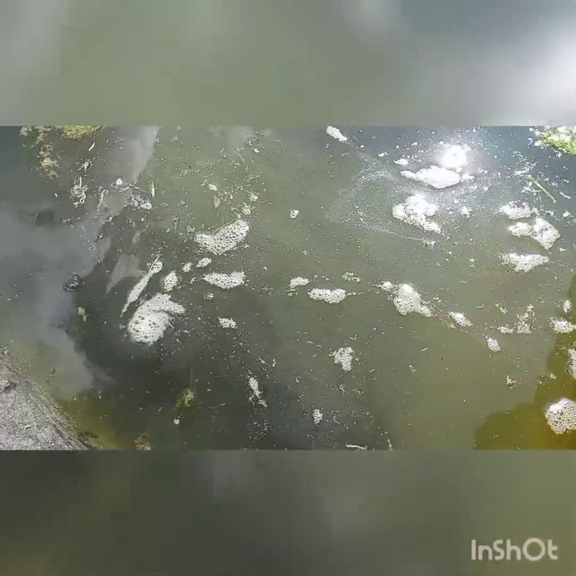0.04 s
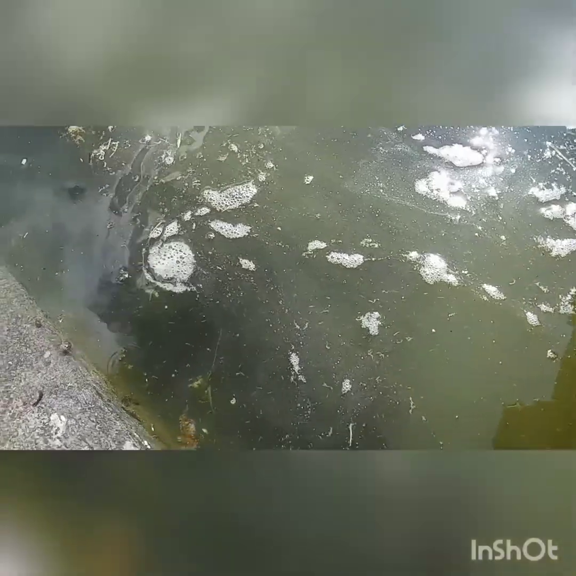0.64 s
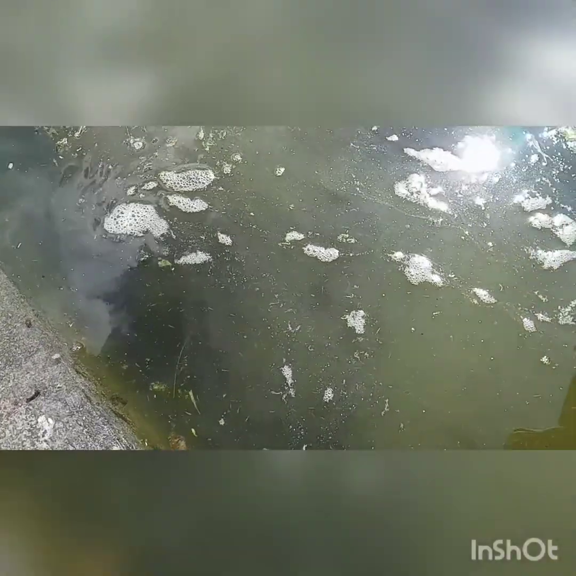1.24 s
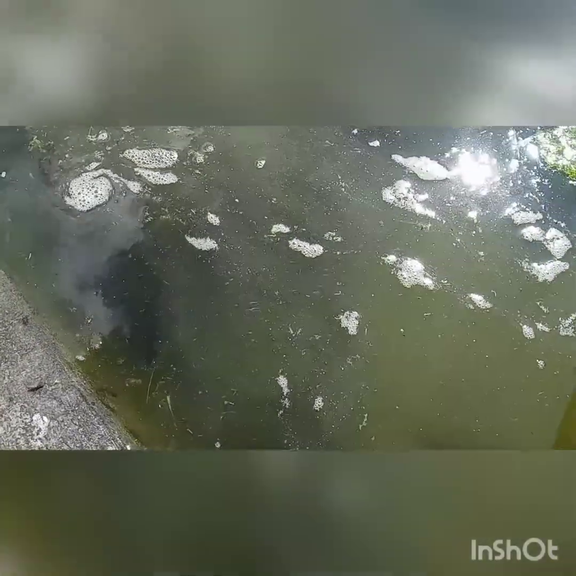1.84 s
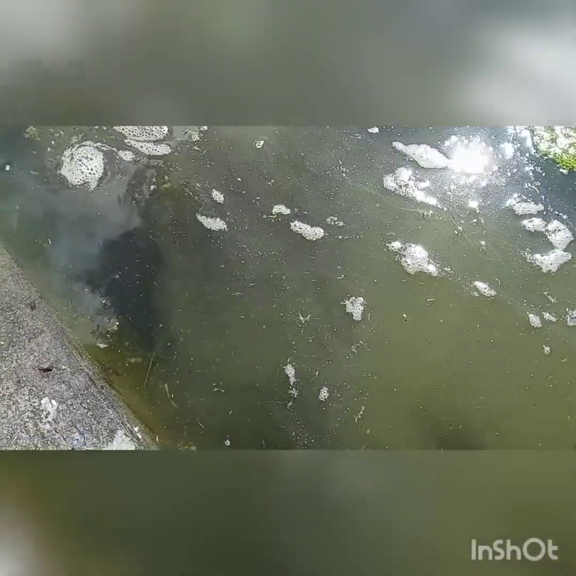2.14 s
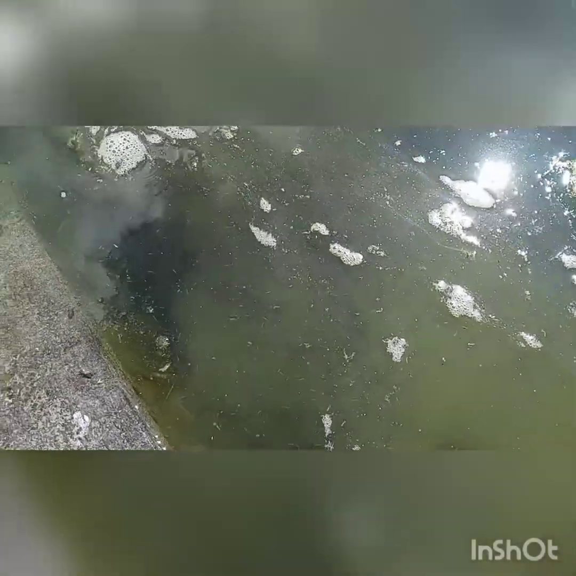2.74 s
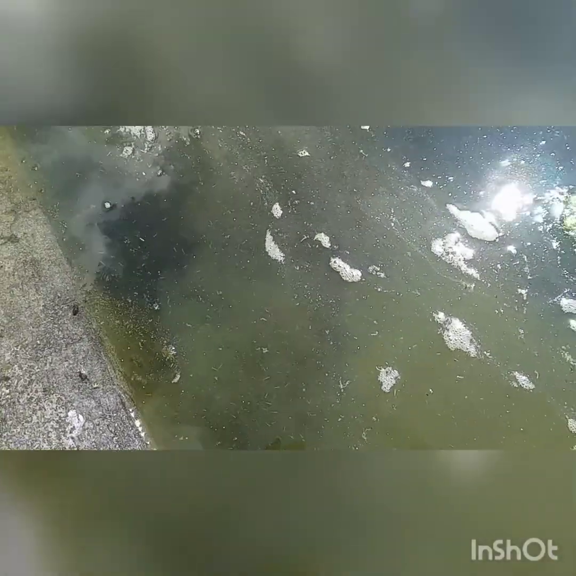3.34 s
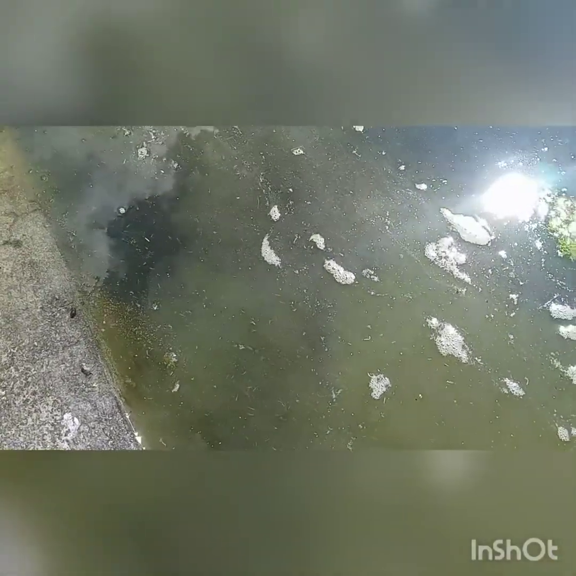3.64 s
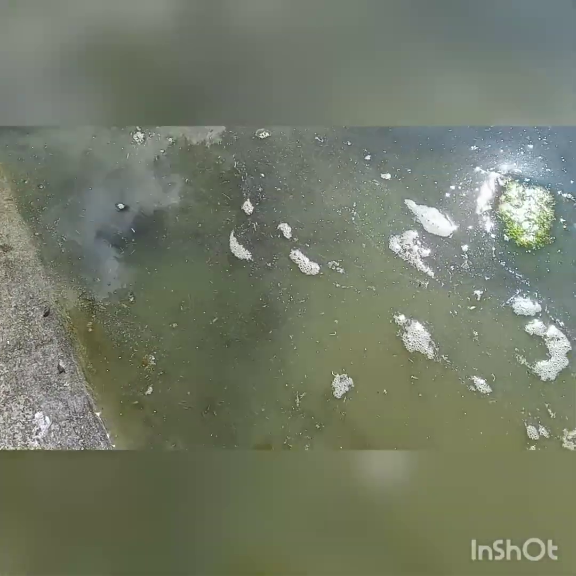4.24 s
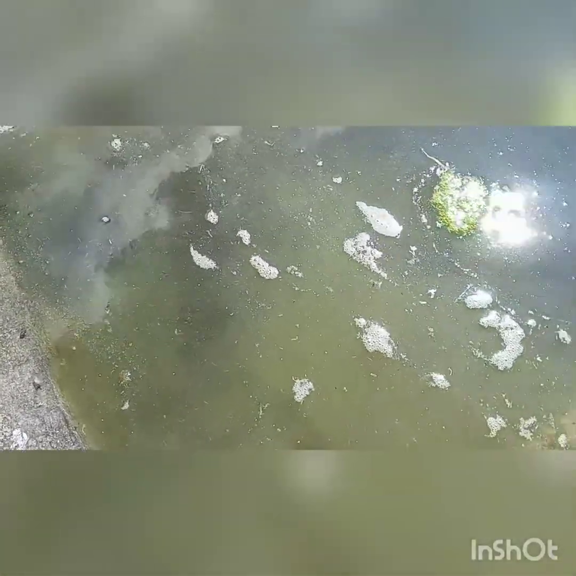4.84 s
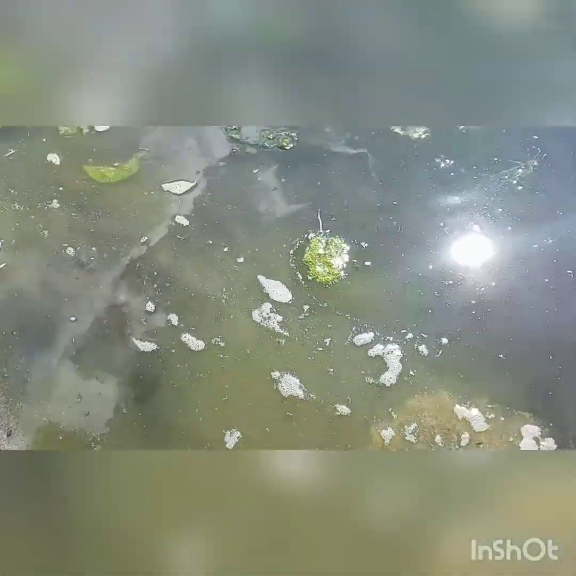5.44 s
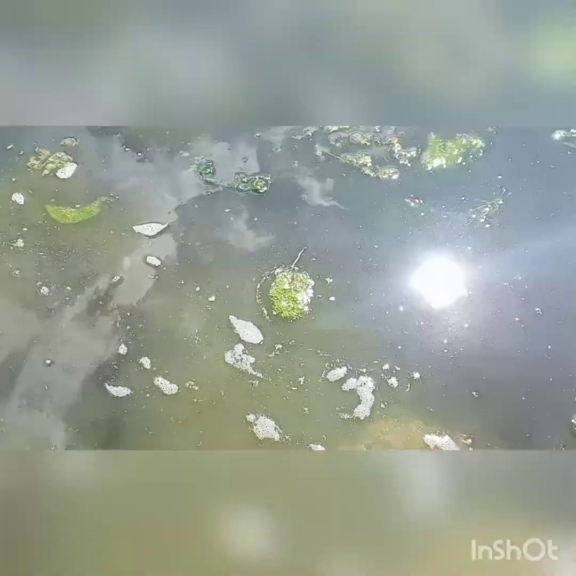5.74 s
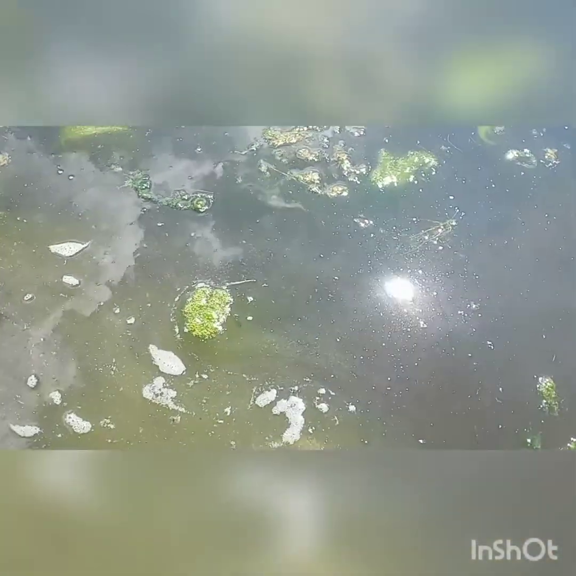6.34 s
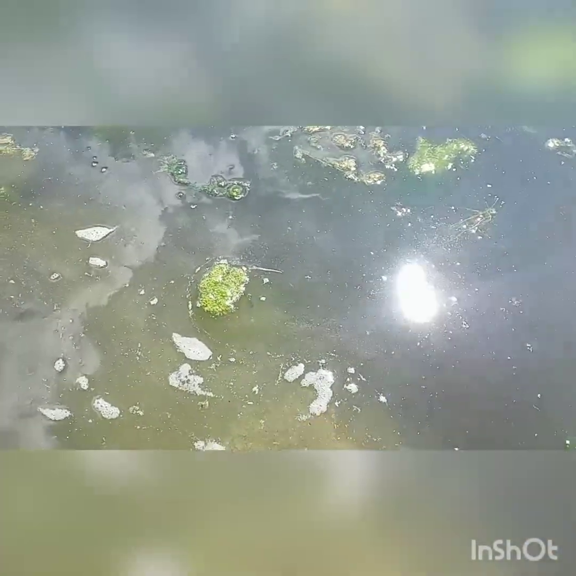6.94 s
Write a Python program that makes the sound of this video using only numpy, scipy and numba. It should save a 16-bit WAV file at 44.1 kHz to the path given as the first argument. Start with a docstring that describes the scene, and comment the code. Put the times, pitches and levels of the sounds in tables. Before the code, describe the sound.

Close plops of pond water build into dripping, gushing splashes off a hollow bucket while two insects chirp outdoors.

```python
"""From the start, pond water laps and plops close by in faint outdoor air, while an insect chirps behind it
in double wing strokes. A second, higher insect ticks, then settles into a trill after two seconds.
From about three seconds a bucket is tipped and lifted out: its wall rings, and water drips, gushes and
splashes, hardest past five seconds and near the end, twice with a thin, high whistle. The water's voice is
trapped air ringing, in single bubbles, soft swarms and sharp bursts; the last big splash rings the bucket."""
import sys
import numpy as np
from scipy import signal
from scipy.fft import rfft, irfft
from scipy.io import wavfile
from scipy.ndimage import uniform_filter1d
from numba import njit

SR = 44100
rng = np.random.default_rng(int(sys.argv[2]) if len(sys.argv) > 2 else 0)


def unload_audio(sound):
    """Save the sound as a 16-bit wav file, at the path given as the first command line argument."""
    columns = np.transpose(np.atleast_2d(sound))
    # keep every value between -1 and 1, then stretch to whole-number steps
    steps = np.round(np.clip(columns, -1, 1) * 32767)
    wavfile.write(sys.argv[1], SR, steps.astype(np.int16))


N = 307818
TIME = np.arange(N) / SR

# Cue levels are set ahead of each layer's own trim.
# short ringing tones: single bubbles, plus the bucket's ring under the last big splash (near 6.8 s):
# start_s, pitch_hz, level_db, nominal_decay_s
RING_CUES = [(0.0, 845.7, -47.5, 0.065), (0.06, 400.6, -39.5, 0.0214), (0.06, 201.4, -34, 0.079),
             (0.064, 250.8, -44, 0.186), (0.07, 162.5, -45, 0.37), (0.169, 760.3, -43, 0.0376),
             (0.38, 715, -45, 0.217), (0.413, 955, -40.5, 0.0097), (0.522, 680, -44, .1),
             (0.539, 650, -37, .24), (0.619, 700.4, -51.5, 0.134), (0.712, 1102, -56, 0.123),
             (0.89, 665, -48, 0.123), (0.9105, 3622, -38, 0.094), (1.078, 1654, -49, 0.079),
             (1.207, 1662, -41.5, .07), (1.759, 1734, -51.5, 0.265), (1.785, 1387, -48, 0.17),
             (1.873, 719.4, -55, 0.14), (1.971, 712.4, -39.5, 0.124), (2.03, 2283, -51.5, 0.06),
             (2.27, 635, -44.5, 0.112), (2.352, 660, -40, 0.148), (2.482, 843.7, -42, 0.029),
             (2.503, 769, -49, 0.114), (2.713, 664.8, -55, 0.206), (2.917, 675.4, -43, 0.088),
             (2.9365, 418.7, -35.5, .04), (2.9385, 4174, -38.5, .03), (3.412, 758, -48.5, 0.096),
             (3.466, 736.1, -36.5, 0.087), (3.717, 673.3, -42, .19), (4.002, 678.3, -41, 0.156),
             (4.039, 674.9, -37.5, 0.1255), (4.464, 873, -49, 0.032), (4.65, 412, -45.5, 0.0386),
             (4.72, 882, -48.5, 0.232), (4.76, 1580, -42, 0.026), (4.796, 1103, -39, 0.033),
             (4.913, 1409, -46.5, 0.094), (4.9507, 2758, -34, 0.04), (5.05, 725, -45.5, 0.058),
             (5.108, 2392, -36.5, 0.039), (5.127, 1075, -36, 0.0396), (5.174, 989, -39, 0.17),
             (5.2323, 797.1, -31, 0.076), (5.3107, 818.7, -27, 0.0757), (5.434, 3707, -23.5, 0.026),
             (5.434, 1331, -35.5, 0.0604), (5.436, 1726, -34, 0.0374), (5.502, 2353, -45, 0.111),
             (5.559, 1105, -32, 0.112), (5.622, 874.4, -49, 0.2), (5.7805, 3929, -28, 0.0272),
             (5.817, 789, -46, 0.14), (5.841, 1523, -43, 0.078), (5.857, 994.5, -45.5, 0.096),
             (5.853, 3025, -44, 0.037), (6.034, 810.5, -52.5, 0.224), (6.093, 645.7, -40, 0.119),
             (6.17, 841.3, -48.5, 0.227), (6.265, 549.5, -41, .05), (6.283, 1841, -27, 0.0102),
             (6.298, 607, -32, 0.025), (6.3146, 634.2, -35.5, 0.042), (6.543, 1273, -45, 0.077),
             (6.648, 727.6, -35.5, 0.078), (6.795, 2034, -25.5, 0.052), (6.796, 1077, -32, 0.074),
             (6.798, 2644, -27, 0.045), (6.824, 158.8, -43.5, 0.075), (6.871, 860.4, -49.5, 0.495),
             (6.898, 834.2, -42.5, 0.064), (6.931, 4167, -41, 0.03), (6.955, 674.3, -40, 0.161)]
# wavelets folding over: start_s, level_db, typical_pitch_hz
LAP_CUES = [(0.039, -53, 1603), (0.06, -55, 806), (0.11, -61.5, 1400), (0.172, -58.5, 1013),
            (0.251, -65.5, 3700), (0.411, -61, 1182), (0.851, -62, 4660), (1.076, -58, 1396),
            (1.211, -58, 1315), (1.62, -64, 1055), (1.789, -57.5, 1387), (1.83, -59.5, 1300),
            (1.9, -60, 900), (2.024, -61.5, 1980), (2.2, -66, 3600), (2.28, -53.5, 800), (2.499, -53, 1010),
            (2.589, -61, 1370), (2.83, -53.5, 2365), (2.84, -59.5, 750), (2.965, -56.5, 2200),
            (3.0, -58, 1600), (3.038, -60, 2990), (3.123, -59.5, 2320), (3.38, -64, 3450),
            (3.42, -58, 1290), (3.48, -53.5, 714), (3.825, -58, 1194), (3.97, -62.5, 1017),
            (4.06, -62, 760), (4.134, -62, 3810), (4.445, -57.5, 534.4), (4.589, -62, 2820),
            (4.656, -62, 2290), (4.744, -61.5, 2200), (5.039, -53.5, 2500), (5.109, -53.5, 2667),
            (5.17, -55.5, 1080), (5.25, -56.5, 1070), (5.34, -56, 1510), (5.84, -54, 2830),
            (5.91, -58.5, 3350), (6.09, -57.5, 600), (6.3, -56, 700), (6.645, -52.5, 620),
            (6.689, -51, 4230), (6.74, -57.5, 1700), (6.835, -53.5, 606)]
# borders of the bubble size classes in a wavelet: edge_hz
LAP_EDGES_HZ = [500, 1100, 2000, 3000, 4100]
# drops hitting the water: start_s, level_db, typical_pitch_hz, spread_octaves
DROP_CUES = [(0.345, -57, 6500, .55), (1.12, -59, 7500, 0.53), (1.527, -61, 7500, .45),
             (2.9392, -38, 620, 1.8), (2.975, -57, 7000, 0.44), (3.29, -57.5, 7500, 0.39),
             (3.305, -58, 7500, .5), (3.619, -55.5, 7500, 0.497), (4.443, -55, 3000, 2.2),
             (4.569, -44, 8580, .55), (4.597, -50, 8500, 0.725), (4.655, -52.5, 450, 1.76),
             (4.798, -49, 3800, 1.4), (4.951, -50.5, 4100, 0.93), (5.0, -45.5, 6400, 0.885),
             (5.027, -51.5, 8000, 0.81), (5.0554, -44.5, 6040, 0.764), (5.106, -46, 8000, 1.81),
             (5.131, -44, 5530, 0.89), (5.1557, -39.5, 5920, 0.856), (5.19, -55.5, 5000, 2.32),
             (5.296, -34.5, 4227, 0.531), (5.311, -46, 3000, 1.77), (5.3368, -45, 3200, 1.24),
             (5.359, -46, 8030, 0.52), (5.392, -51.5, 7000, 0.53), (5.409, -54, 7500, 0.44),
             (5.435, -32.5, 3900, 0.725), (5.5444, -41.5, 11600, 0.39), (5.5598, -48.5, 4500, 2.6),
             (5.741, -39.5, 4650, 0.475), (5.7803, -42.5, 4380, 0.703), (5.792, -43, 6400, 1.43),
             (5.911, -48.5, 4990, 0.594), (6.2836, -42.5, 5000, 2.5), (6.677, -49, 9100, 0.77),
             (6.731, -56.5, 7994, 0.88), (6.78, -31.5, 3170, 1.45), (6.785, -37, 6500, 2.15),
             (6.7949, -30, 2570, 1.23), (6.7985, -32, 5500, 2.38), (6.8224, -36, 2200, 0.75),
             (6.828, -42.5, 2190, 2.05), (6.866, -48.5, 7500, 0.31), (6.931, -50, 3840, 0.714)]
# bubble size classes in an impact: low_hz, high_hz
DROP_BANDS = [(430, 950), (1330, 2900), (3500, 5240), (6200, 9127), (9500, 16220)]
# tone of every impact, one entry per size class: gain_db
DROP_EQ = [-6, -1, -3, -0.5, -4]
# gushes running off the bucket, rising and falling by 20 dB: peak_s, level_db, rise_s, fall_s
GUSHES = [(4.62, -67, 0.21, 0.45), (5.3, -63.5, 0.256, 0.46), (5.68, -74, 0.37, 0.78),
          (6.35, -71, 0.45, 0.01), (6.72, -59, 0.136, 0.15)]
# gurgle, patter, spray and finest spray of the run-off: low_hz, high_hz, bubble_count, level_db
RUNOFF_BANDS = [(620, 1400, 1200, 0), (1400, 4600, 6000, -6),
                (6300, 9500, 20000, -3), (9000, 15000, 30000, -7)]
# hollow ring of the bucket: pitch_hz, width_hz, gain_db
BUCKET_MODES = [(986.7, 24.4, 3), (1027, 17, -10), (1665, 66, -5.5), (2109, 86, -12), (2232, 158, 1.5),
                (2620, 32, -21.5), (3242, 235, -5), (3789, 164, -8), (4114, 136, -0.5)]
# water rubbing along its wall, rising and falling by 20 dB: peak_s, level_db, rise_s, fall_s
WALL_RUBS = [(2.98, -61, 0.126, 0.02), (3.31, -60, 0.394, 0.2673), (4.66, -68.5, 0.125, 1.7),
             (5.3, -55.5, 0.312, 0.2118), (5.51, -57, 0.083, 0.0357), (6.54, -60, 0.23, 0.03)]
# thin, very high whistles: start_s, length_s, top_pitch_hz, level_db
WHISTLE_CUES = [(4.942, 0.395, 12300, -59.5), (6.38, 0.215, 12330, -65)]
# chirps of the nearer insect: start_s, double_stroke_count, period_s, level_db
CHIRP_CUES = [(-0.013, 9, 0.0413, -49.5), (0.85, 9, 0.04255, -47.5), (1.736, 9, .0421, -44),
              (2.907, 9, .0411, -43.5), (4.187, 9, .0415, -42.5), (5.03, 6, .042, -47),
              (5.832, 10, 0.0427, -49)]
# lone strokes of the higher insect before it gets going: start_s, level_db
TICK_CUES = [(0.0, -57), (0.191, -57), (0.401, -59), (0.753, -58), (1.115, -54), (1.403, -61.5),
             (1.722, -60), (1.857, -63.5), (2.15, -61.5)]
# course of its trill: time_s, top_pitch_hz, level_db
TRILL_CURVE = [(2.269, 7100, -67.5), (2.8, 7155, -66.5), (3.3, 7115, -62.5), (4.2, 7189, -59),
               (4.9, 7339, -58.5), (5.9, 7560, -59), (6.35, 7360, -64.5), (6.58, 7578, -56),
               (6.98, 7660, -58.5)]
# its strokes bend further in pitch as it warms up: time_s, share_of_top_pitch
TRILL_BEND = [(2.3, .1), (3.5, .12), (5.0, .18), (6.6, .2)]
# unevenness of its strokes: time_s, scatter_db
TRILL_SCATTER = [(2.2, 0), (2.3, 3), (3.3, 2.5), (3.7, .8)]
# tone of the open air's hiss: frequency_hz, gain_db
AIR_EQ = [(200, 4.5), (350, 0.5), (550, -4.5), (750, -11), (1200, -12.5), (2200, -12), (4400, -11),
          (5300, -24), (6200, -18), (7000, -7), (8400, -6.5), (9600, -13), (12000, -17.5), (15800, -19)]
# fader ride on that hiss: time_s, gain_db
AIR_RIDE = [(0, -0.5), (.82, -1), (1.12, 5.5), (1.36, -6), (1.9, 1), (3.9, -1.5), (6.1, -2), (6.98, 2.5)]
# borders of its rustling bands: edge_hz
AIR_EDGES_HZ = [0, 600, 1200, 2200, 3500, 5500, 7600, 9500, SR]
# tone of the breeze's low rumble: frequency_hz, gain_db
BREEZE_EQ = [(25, -22), (45, -12), (75, 4), (130, 2.5), (200, -8), (320, -16), (600, -35)]
# fader ride on that rumble: time_s, level_db
BREEZE_RIDE = [(0.15, -66.5), (0.35, -75), (0.9, -79.5), (1.5, -82), (1.87, -70.5), (2.1, -82.5),
               (3.15, -68), (3.9, -78.5), (4.9, -65.5), (5.35, -69), (6.0, -64.5), (6.98, -68.5)]
# echoes off the bank and the bucket: delay_s, gain_db
ECHO_TAPS = [(.0026, -20), (.0066, -12.5), (0.0135, -35)]


def ringing_tones(glide=0.1168, waver=0.0117, trim_db=-2, brood_db=-16.5, count=24):
    """Single bubbles, and the bucket under the last big splash, ring and bend up, trailing small bubbles."""
    out, wobble = np.zeros(N), 1 + waver * drift(120)
    for start, hz, level_db, decay in RING_CUES:
        attack_s = 0.00497 * (700 / hz) ** 0.8006  # higher tones speak sooner
        t60 = 0.93 * decay
        t = np.arange(int((attack_s + t60) * SR)) / SR
        attack = np.sin(np.pi / 2 * np.minimum(t / attack_s, 1)) ** 2
        release = np.exp(-np.log(1000) * np.maximum(t - attack_s, 0) / t60)
        rise = glide * (1 + 0.436 * rng.standard_normal())
        pitch = hz * (1 + rise * (t - attack_s) / t60) * np.interp(start + t, TIME, wobble)
        add(out, start, undb(level_db + trim_db) * attack * release * sine(pitch))
        age = staggered(count)
        brood_s = 0.075 * min(700 / hz, 1)  # and leave a shorter trail
        brood = swarm(age * brood_s, np.exp(-2.6 * age), .88 * hz, 1.3 * hz, cycles=40, n=SR // 5)
        add(out, start + attack_s + .01, undb(level_db + brood_db) * brood)
    return out


def swarm(starts, sizes, low_hz, high_hz, cycles, n, glide=0.036):
    """Bubbles of random radius, damping and polarity, all starting within one pitch band."""
    pitch, damping, polarity = rng.random((len(starts), 3)).T
    hz = low_hz * (high_hz / low_hz) ** pitch
    return ring_bubbles(n, starts, hz, cycles * (.5 + damping), sizes * np.sign(polarity - .5), glide)


@njit
def ring_bubbles(n, starts, hz, cycles, sizes, glide):
    """Small bubbles: sines that swell quickly, then bend upward as they die by 60 dB over `cycles`."""
    out = np.zeros(n)
    for k in range(len(starts)):
        life = cycles[k] * SR / hz[k]
        step = 2 * np.pi * hz[k] / SR
        pole = np.exp(1j * step - np.log(1000) / life)
        bend = np.exp(1j * step * glide / life)
        phasor, first, swell = sizes[k] + 0j, int(starts[k] * SR), 0.
        for i in range(first, min(n, first + int(life))):
            phasor, pole = phasor * pole, pole * bend
            swell += (1 - swell) * step / 6
            out[i] += swell * swell * phasor.imag
    return out


def laps(length_s=0.12, trim_db=-3, spread_octaves=0.601, count=60):
    """A wavelet folds over and lets go a soft swarm of bubbles that thins out."""
    out = np.zeros(N)
    for start, level_db, hz in LAP_CUES + ripples():
        for low, high in zip(LAP_EDGES_HZ, LAP_EDGES_HZ[1:]):
            age = staggered(count)
            envelope = np.minimum(age / 0.0888, 1) * np.exp(-4.53 * age)
            sizes = envelope * undb(2.73 * rng.standard_normal(count))
            fold = swarm(age * length_s, sizes, low * 1.08, high, cycles=55, n=SR // 4)
            gain = undb(level_db + trim_db + max(band_db(low, high, hz, spread_octaves), -18))
            body_rms = np.sqrt(np.mean(fold[:SR // 33] ** 2) + 1e-12)
            add(out, start - 0.0045, gain * fold / body_rms)
    return out


def ripples(count=26, level_db=-70, scatter_db=3):
    """Extra lap cues: faint wavelets at random moments, filling in between the larger ones."""
    when, pitch, strength = rng.random((count, 3)).T
    starts = (np.arange(count) + when) / count * N / SR
    return list(zip(starts, level_db + scatter_db * (2 * strength - 1), 650 * 6 ** pitch))


def drops(burst_s=.025, spatter_s=0.059, spatter_db=-19, trim_db=-1, count=40):
    """An impact throws off a sharp burst of tiny bubbles; thin spatter falls back after it."""
    out = np.zeros(N)
    for start, level_db, hz, spread in DROP_CUES:
        for (low, high), eq_db in zip(DROP_BANDS, DROP_EQ):
            age = staggered(count) ** 1.6  # crowded into the first instant
            sizes = np.exp(-4 * age ** 1.013) * undb(3.15 * rng.standard_normal(count))
            cycles = 26 * (low / 2500) ** 0.865
            burst = swarm(age * burst_s, sizes, low, high, cycles, SR // 8)
            spatter_sizes = undb(spatter_db) * rng.exponential(size=count) * (1 - age)
            burst += swarm(age * spatter_s, spatter_sizes, low, high, cycles, SR // 8)
            gain = undb(level_db + trim_db + eq_db + max(band_db(low, high, hz, spread), -26))
            attack_rms = np.sqrt(np.mean(burst[:SR // 200] ** 2) + 1e-12)
            add(out, start, gain * burst / attack_rms)
    return out


def bucket(splashes, struck_db=-9, rubbed_db=12.5):
    """The bucket's wall rings hollow as water rubs along it and splashes strike it."""
    rubbing = unit(rng.standard_normal(N)) * surges(WALL_RUBS, rest_db=-84.5)
    drive = undb(rubbed_db) * rubbing + undb(struck_db) * splashes
    return sum(undb(db) * signal.lfilter(*signal.iirpeak(hz, hz / width, fs=SR), drive)
               for hz, width, db in BUCKET_MODES)


def runoff(scatter_db=3, patchy_db=4.5):
    """Water runs off the bucket in uneven dribbles and gushes of bubbles, from gurgle to fine spray."""
    out = np.zeros(N)
    for low, high, count, db in RUNOFF_BANDS:
        sizes = undb(scatter_db * np.minimum(rng.exponential(size=count), 4))
        gain = undb(db + patchy_db * drift(45))
        out += gain * unit(swarm(rng.random(count) * N / SR, sizes, low, high, cycles=45, n=N))
    return out * surges(GUSHES, rest_db=-82)


def whistle(sag=0.091, waver=.025):
    """A thin, hissy whistle swells, arches and wavers high above the water."""
    out, wobble = np.zeros(N), 1 + waver * drift(55)
    hiss = unit(signal.sosfilt(signal.butter(2, 380, fs=SR, output="sos"), rng.standard_normal(N)))
    for start, length, hz, db in WHISTLE_CUES:
        arch = np.sin(np.pi * np.clip((TIME - start) / length, 0, 1))
        out += undb(db) * arch * hiss * sine(hz * (1 - sag * (1 - arch)) * wobble)
    return out


def chirping_insect(soft_db=-8, swell_s=0.0607, lag_s=0.0037, sweep_hz=(4720, 4590, 4080)):
    """Each chirp is a swelling run of double wing strokes, both falling in pitch, the second longer."""
    out = np.zeros(N)
    for start, strokes, period, peak_db in CHIRP_CUES:
        for k in range(strokes):
            age = k * period + lag_s * ((k > 0) + (k == strokes - 1))  # first and last gaps drag
            level_db = peak_db + soft_db * np.exp(-age / swell_s) + 0.65 * rng.standard_normal()
            add(out, start + age - .0055, undb(level_db - 1.2) * wing_stroke(.0105, *sweep_hz))
            add(out, start + age + .0062, undb(level_db) * wing_stroke(.0125, *sweep_hz))
    return out


def trilling_insect(stroke_hz=58.2, jitter_s=0.00044):
    """The higher insect: arched wing strokes, lone at first, then a trill that steadies and bends wider."""
    out = np.zeros(N)
    times, tops, levels = np.transpose(TRILL_CURVE)
    run = [(s, np.interp(s, times, levels)) for s in np.arange(times[0], N / SR, 1 / stroke_hz)]
    for start, db in TICK_CUES + run:
        top_hz = np.interp(start, times, tops, left=7400) * (1 + .012 * rng.standard_normal())
        bend = np.interp(start, *np.transpose(TRILL_BEND), left=.18)
        scatter_db = np.interp(start, *np.transpose(TRILL_SCATTER))
        arch = wing_stroke(.013, (1 - .8 * bend) * top_hz, top_hz, (1 - bend) * top_hz)
        onset = start + jitter_s * rng.standard_normal()
        add(out, onset, undb(db + scatter_db * rng.standard_normal()) * arch)
    return out


def wing_stroke(length_s, start_hz, middle_hz, end_hz):
    """A short tone whose pitch follows the speed of the wing's scraper."""
    progress = np.linspace(0, 1, int(length_s * SR))
    slide = start_hz * (1 - progress) + end_hz * progress
    arch = (middle_hz - (start_hz + end_hz) / 2) * np.sin(np.pi * progress)
    detune = 1 + .005 * rng.standard_normal()
    return signal.windows.tukey(len(progress), .75) * sine((slide + arch) * detune)


def open_air(hiss_db=-70.5, rustle_db=2.5, flutter_db=3):
    """A bed of air whose bands rustle each on their own, over a fluttering rumble of breeze."""
    spectrum, bins = rfft(noise(AIR_EQ)), np.arange(N // 2 + 1) * SR / N
    hiss = sum(irfft(spectrum * (bins >= low) * (bins < high), N) * undb(rustle_db * drift(22.02))
               for low, high in zip(AIR_EDGES_HZ, AIR_EDGES_HZ[1:]))
    rumble = noise(BREEZE_EQ) * undb(ride(BREEZE_RIDE) + 2.5 + flutter_db * drift(24))
    return hiss * undb(hiss_db + ride(AIR_RIDE)) + rumble


def bank_reverb(dry, t60, wet_db, dull_hz):
    """Adds a short diffuse tail scattered from the banks and plants."""
    t = np.arange(SR // 2) / SR
    tail = rng.standard_normal(len(t)) * np.exp(-np.log(1000) * t / t60) * np.minimum(t / 0.00103, 1)
    tail /= np.sqrt(np.sum(tail ** 2))
    tail = signal.sosfilt(signal.butter(1, dull_hz, fs=SR, output="sos"), tail)
    return dry + undb(wet_db) * signal.fftconvolve(dry, tail)[:N]


def surges(table, rest_db):
    """Gain of a flow that surges to each peak and ebbs again, over a resting level."""
    power = undb(rest_db) ** 2
    for peak_s, db, rise, fall in table:
        power = power + undb(db - 20 * np.maximum((peak_s - TIME) / rise, (TIME - peak_s) / fall)) ** 2
    return np.sqrt(power)


def band_db(low_hz, high_hz, typical_hz, spread):
    """Level of one bubble size class: half the amplitude at `spread` octaves from the typical pitch."""
    return 20 * np.log10(.5) * (np.log2(np.sqrt(low_hz * high_hz) / typical_hz) / spread) ** 2


def noise(eq):
    """Noise shaped by an EQ curve, rms 1."""
    hz, db = np.transpose(eq)
    bins = np.arange(N // 2 + 1) * SR / N
    gain = undb(np.interp(np.log(bins + 1), np.log(hz), db))
    return unit(irfft(rfft(rng.standard_normal(N)) * gain, N))


def drift(rate_hz):
    """Smooth random modulation, rms 1."""
    hold = int(SR / rate_hz)
    steps = np.repeat(rng.standard_normal(N // hold + 1), hold)
    return unit(uniform_filter1d(uniform_filter1d(steps, hold), hold)[:N])


def staggered(count):
    """Loosely even steps from 0 to 1."""
    return (np.arange(count) + rng.random(count)) / count


def sine(hz):
    """A tone that follows a pitch curve."""
    return np.sin(2 * np.pi * np.cumsum(hz) / SR)


def ride(table):
    """Fader points joined by straight lines."""
    return np.interp(TIME, *np.transpose(table))


def undb(db):
    """Decibels to gain."""
    return 10 ** (np.asarray(db) / 20)


def unit(x):
    """Scale to rms 1."""
    return x / np.sqrt(np.mean(x ** 2) + 1e-20)


def add(out, start_s, sound):
    """Mix a sound in on its cue."""
    first = min(max(int(start_s * SR), 0), N)
    out[first:first + len(sound)] += sound[:N - first]


def scene():
    """Water and bucket up front with their echoes, insects further off, open air behind."""
    splashes = drops()
    water = ringing_tones() + laps() + runoff() + whistle() + bucket(splashes) + splashes
    for delay, db in ECHO_TAPS:
        add(water, delay, undb(db) * splashes)
    near = bank_reverb(water, t60=0.11, wet_db=-9, dull_hz=3500)
    chirps = bank_reverb(chirping_insect(), t60=0.078, wet_db=-5, dull_hz=8600)
    trill = bank_reverb(trilling_insect(), t60=.12, wet_db=-6, dull_hz=14000)
    return (near + chirps + trill + open_air())[None]


def record(dry):
    """The microphone rolls off the deepest bass and cuts the top."""
    body = signal.sosfilt(signal.butter(2, 45, "high", fs=SR, output="sos"), dry)
    return signal.sosfilt(signal.ellip(10, .2, 70, 15900, fs=SR, output="sos"), body)


dry = scene()
out = record(dry)
unload_audio(out)
```